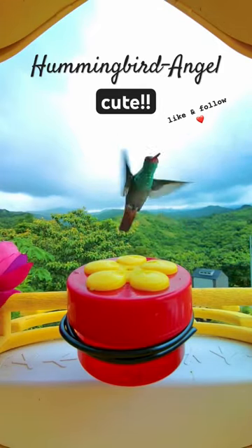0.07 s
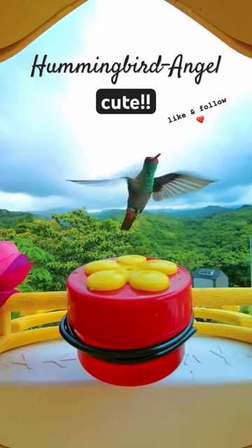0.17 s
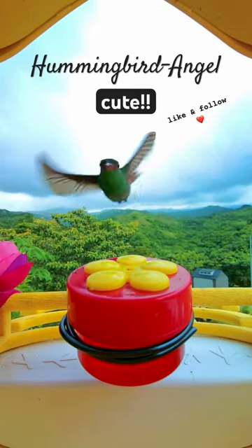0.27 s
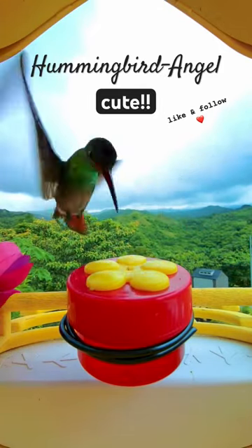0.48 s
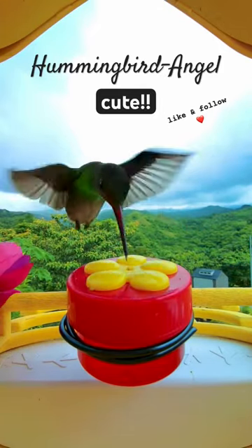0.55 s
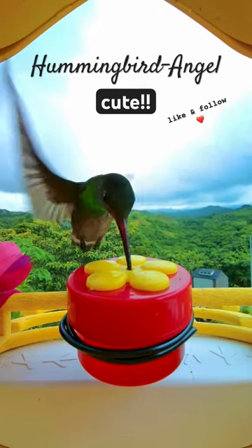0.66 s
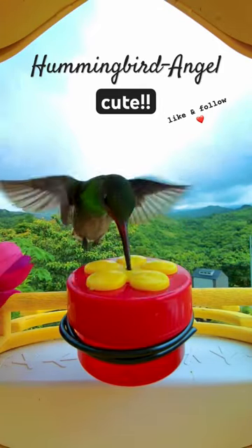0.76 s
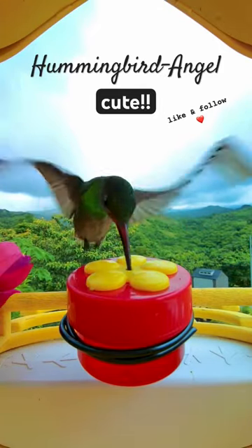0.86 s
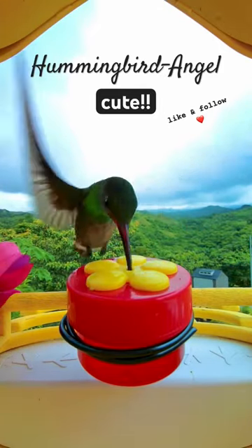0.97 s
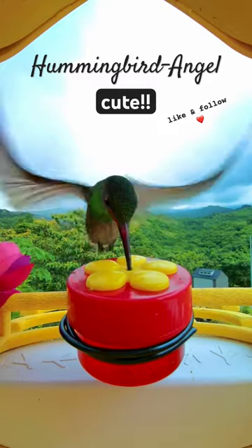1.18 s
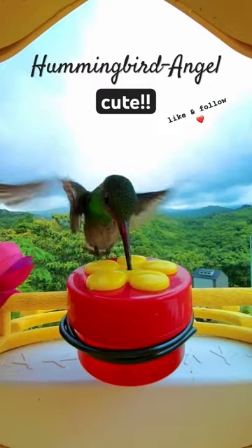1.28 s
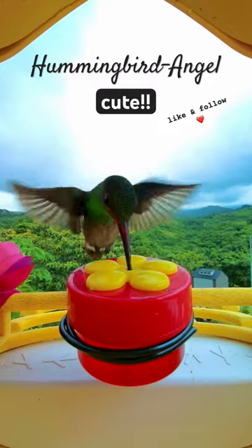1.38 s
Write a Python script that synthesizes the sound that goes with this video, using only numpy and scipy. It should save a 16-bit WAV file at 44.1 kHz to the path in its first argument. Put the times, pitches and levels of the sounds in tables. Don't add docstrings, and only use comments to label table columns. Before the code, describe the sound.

A hovering hummingbird's deep pulsing wing hum, after one short bright chirp ringing off a hillside

```python
import sys
import numpy as np
from scipy import signal
from scipy.fft import rfft, irfft
from scipy.io import wavfile
from scipy.ndimage import uniform_filter1d

SR = 44100
rng = np.random.default_rng(int(sys.argv[2]) if len(sys.argv) > 2 else 0)


def invert_db(level):
    return 10 ** (np.asarray(level, dtype=float) / 20)


def inscribe(sig):
    pcm = np.round(np.clip(np.atleast_2d(sig).T, -1, 1) * 32767)
    wavfile.write(sys.argv[1], SR, pcm.astype(np.int16))


N = 63945


def level(x, db):
    return x * invert_db(db) / np.sqrt(np.mean(x ** 2))


def band(x, hz, width_hz):
    return signal.lfilter(*signal.iirpeak(min(hz, .45 * SR), hz / width_hz, fs=SR), x)


def coloured(peaks):
    total = np.zeros(N)
    for hz, width_hz, db in peaks:
        ringing = band(band(rng.standard_normal(N), hz, width_hz), hz, width_hz)
        total += level(ringing, db)
    return level(total, 0)


def walk(rate_hz):
    k = int(SR / rate_hz)
    return level(uniform_filter1d(uniform_filter1d(rng.standard_normal(N), k), k), 0)


def columns_at(t, table):
    when, *columns = np.array(table).T
    return [np.interp(t, when, column) for column in columns]


# (frequency [Hz], density [dB per Hz])
HISS_SPECTRUM = [(18, -35.5), (30, -1.5), (597, -3.5), (662, -5), (716, -4.5), (1340, -10), (1730, -9),
                 (11600, -9.5), (15000, -13)]


def hiss():
    hz, db = np.array(HISS_SPECTRUM).T
    f = np.fft.rfftfreq(N, 1 / SR) + 1
    tilt = invert_db(np.interp(np.log(f), np.log(hz), db))
    return level(irfft(rfft(rng.standard_normal(N)) * tilt, N), -68)


# (centre [Hz], width [Hz], level [dB])
ECHO_COLOUR = [(750, 567, -3.5), (1489, 1000, -7.5), (3350, 9000, 1.5), (5650, 1600, -1),
               (10000, 6000, -2.5)]


def hillside(t):
    start_s, swell_s, t60_s = .22, .016, .97
    since = np.maximum(t - start_s, 0)
    swell = 1 - np.exp(-since / swell_s)
    return coloured(ECHO_COLOUR) * swell * invert_db(-51 - 60 * since / t60_s)


def thumps(since, pitch_hz, chance):
    thump_s, thump_lead_s, thump_lag_rad = .0019, .0008, 1.1
    heave_s, heave_lead_s, heave_lag_rad = .0027, .0025, .8
    heave_db, heave_hz = -13, 96
    pitch_scatter, scatter_db = .04, 1.6
    hz = pitch_hz * (1 + pitch_scatter * chance[0])
    pulse = np.exp(-.5 * ((since + thump_lead_s) / thump_s) ** 2)
    pulse = pulse * np.cos(2 * np.pi * hz * since - thump_lag_rad)
    early = since + heave_lead_s
    heave = invert_db(heave_db) * np.exp(-.5 * (early / heave_s) ** 2)
    heave = heave * np.cos(2 * np.pi * heave_hz * early - heave_lag_rad)
    return invert_db(scatter_db * chance[1]) * (heave - pulse)


def air_swirl(turns, extra_db):
    pulse_db = 1.5 * np.sin(2 * np.pi * (turns + .033))
    patchy_db = 1.5 * walk(4.7)
    air = coloured([(209, 267, 0), (110, 80, -9)])
    air = signal.sosfilt(signal.butter(4, 324, fs=SR, output="sos"), air)
    return air * invert_db(-20 + extra_db + pulse_db + patchy_db)


# (time [s], rate [strokes per s])
WING_BEAT = [(0, 30.48), (.197, 34.37), (.234, 29.08), (.26, 41.74), (.352, 32.98), (.42, 32.99),
             (.514, 31.96), (.555, 40.03), (.631, 35.3), (.648, 31.43), (.707, 35.02), (.738, 32.83),
             (.896, 33.37), (1.065, 33.28), (1.19, 34.61), (1.214, 32.0), (1.301, 33.54), (1.45, 30.04)]
# (time [s], thump peak [dB], thump pitch [Hz], extra swirl [dB])
WING_EFFORT = [(0, -63, 186, 9.5), (0.151, -66.5, 181, 3), (.24, -56, 166, 4), (.29, -40, 260, -3),
               (.32, -36, 210, -7), (.36, -41.5, 190, 1), (.43, -42.5, 180, 7.5), (.50, -51.5, 141, 0.5),
               (0.537, -41, 140, 1.5), (0.579, -34, 160, 0), (0.642, -36, 169, 0.5), (.68, -39.5, 167, 0),
               (.76, -39, 162, 0.5), (.95, -36.5, 179, -0.5), (1.04, -38.5, 201.2, 6),
               (1.14, -37.5, 187, 7), (1.249, -37, 183.1, -1.5), (1.45, -38.5, 173, -7)]
# (centre [Hz], width [Hz], level [dB])
FEATHER_COLOUR = [(600, 910, 1), (5530, 1300, -3.5)]


def wings(t):
    rate, = columns_at(t, WING_BEAT)
    turns = .18 + np.cumsum(rate) / SR
    stroke = np.round(turns).astype(int)
    since = (turns - stroke) / rate
    chance = rng.standard_normal((64, 2))[stroke].T
    effort_db, pitch_hz, swirl_db = columns_at(t, WING_EFFORT)
    thump = thumps(since, pitch_hz, chance)
    lift = invert_db(-17) * np.sin(4 * np.pi * turns)
    swirl = air_swirl(turns, swirl_db)
    feathers = coloured(FEATHER_COLOUR) * invert_db(-37.5)
    return invert_db(effort_db) * (thump + lift + swirl + feathers)


# (centre [Hz], width [Hz], level [dB])
INTAKE_COLOUR = [(4900, 1400, 5.5), (7150, 1800, -6), (12100, 6000, -7), (2500, 2500, -17.5)]


def intake(t):
    start_s, length_s = .2185, .012
    share = np.clip((t - start_s) / length_s, 0, 1)
    swell = np.sin(np.pi * share) ** .3
    return invert_db(-50 + 1.5 * walk(600)) * swell * coloured(INTAKE_COLOUR)


def shaky(rough):
    wander = walk(850) + 1j * walk(850)
    return np.sqrt(1 - rough) + np.sqrt(rough / 2) * wander


# (time [s], upper voice [Hz], lower voice [Hz], upper level [dB], lower level [dB], roughness [0-1])
CHIP_VOICES = [
    (.2355, 5900, 4500, -52, -48, .5),
    (.239, 6250, 4750, -28, -28, .55),
    (.243, 6050, 4880, -28, -21, .4),
    (.247, 5720, 4570, -22, -28, .12),
    (.2535, 5430, 4320, -21, -34, .08),
    (.256, 5380, 4370, -29, -34, .85),
    (.266, 5400, 4480, -34, -39, .85),
    (.277, 5550, 4520, -31, -38, .75),
    (.286, 5550, 4500, -52, -58, .9),
]
# (centre [Hz], width [Hz], level [dB])
RASP_COLOUR = [(2243, 400, -6.5), (3044, 500, -3), (3817, 500, 0.5), (5150, 440, 9.5), (7415, 2700, 1),
               (10500, 4900, 1), (13500, 1500, -8)]


def chip(t):
    start, end = CHIP_VOICES[0][0], CHIP_VOICES[-1][0]
    up_hz, low_hz, up_db, low_db, rough = columns_at(t, CHIP_VOICES)
    rough = np.clip(rough, 0, 1)
    up = np.exp(2j * np.pi * np.cumsum(up_hz) / SR)
    low = np.exp(2j * np.pi * np.cumsum(low_hz) / SR)
    up_gain, low_gain, both = invert_db(up_db), invert_db(low_db), invert_db((up_db + low_db) / 2)
    late = np.clip((t - start) / .014, 0, 1) ** 2

    voices = up_gain * up * shaky(rough) + low_gain * low * shaky(rough)
    wobble = 1 + .35 * walk(500) + .35j * walk(500)
    difference = invert_db(-17) * (.4 + .6 * np.sqrt(late)) * up / low * wobble
    sideband = invert_db(-11) * late * up ** 2 / low * shaky(rough)
    overtones = invert_db(-27.5) * late * (up * low * shaky(rough) + up ** 2 * shaky(rough))
    tone = voices + both * (difference + sideband + overtones)

    crackle_db = 3 * walk(700)
    rasp = up_gain ** .71 * invert_db(-19.5 + crackle_db) * (.38 + late) * coloured(RASP_COLOUR)
    return (np.sqrt(2) * tone.real + rasp) * ((t > start) & (t < end))


def scene():
    t = np.arange(N) / SR
    return (wings(t) + chip(t) + intake(t) + hillside(t) + hiss())[None]


def thin_treble(x):
    hz, when, z = signal.stft(x, SR, nperseg=2048, window="cosine")
    power = uniform_filter1d(abs(z) ** 2, size=6, axis=1)
    power = uniform_filter1d(power, size=2, axis=2)
    around = uniform_filter1d(power, size=41, axis=1)
    starved = np.interp(when, [.33 - .05, .33, .95, 1.3], [0, 1, 1, .15])
    by_pitch = np.interp(hz, [1000, 1500, 6000, 9000], [0, .6, .75, 1])[:, None]
    share = (.55 + .45 * starved) * by_pitch
    treble = power[:, hz > 3000]
    quiet = treble.mean(axis=1, keepdims=True) < 30 * np.median(treble)
    weak = quiet & (power < share * around)
    top_hz = np.where(quiet, 14850, 15500)
    keep = ~weak & (hz[:, None] < top_hz)
    return signal.istft(z * keep, SR, nperseg=2048, window="cosine")[1][:, :N]


def low_pass(x):
    return signal.sosfilt(signal.butter(12, 15420, fs=SR, output="sos"), x)


def record(dry):
    mic = signal.sosfilt(signal.butter(2, 55, "high", fs=SR, output="sos"), dry)
    return low_pass(thin_treble(mic))


dry = scene()
out = record(dry)
inscribe(out)
```